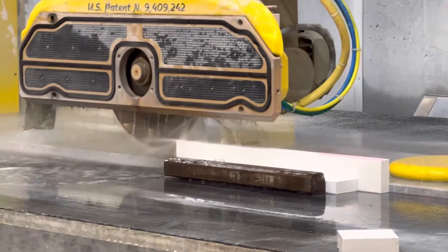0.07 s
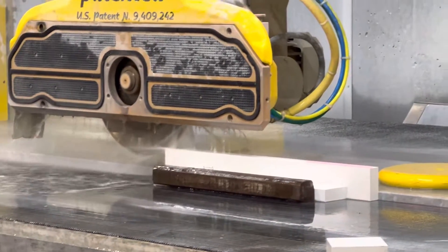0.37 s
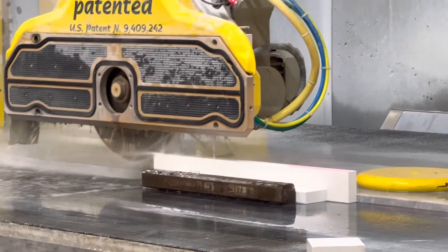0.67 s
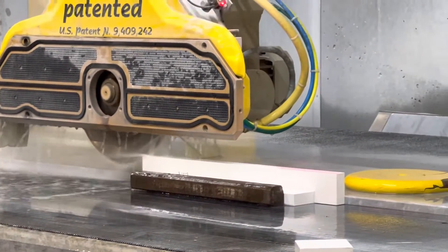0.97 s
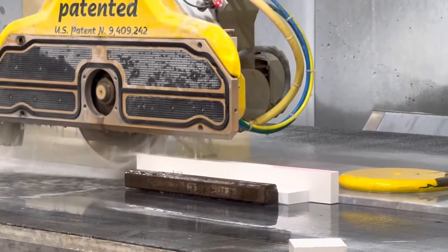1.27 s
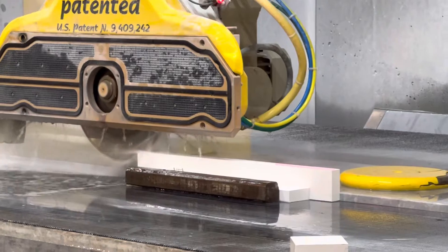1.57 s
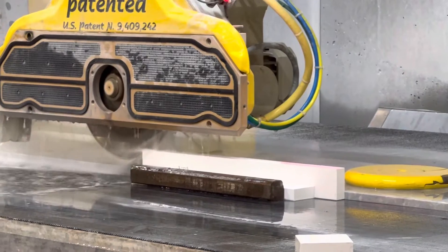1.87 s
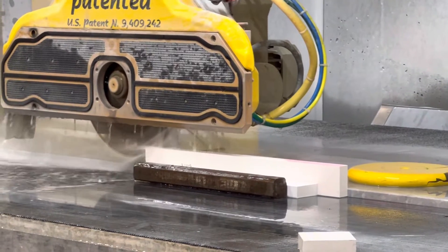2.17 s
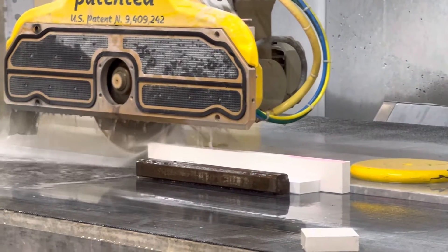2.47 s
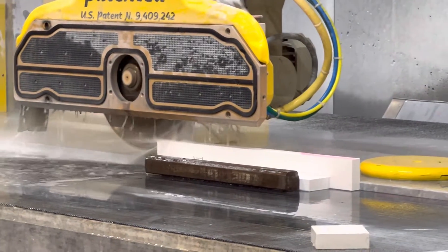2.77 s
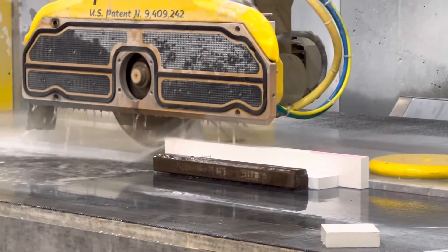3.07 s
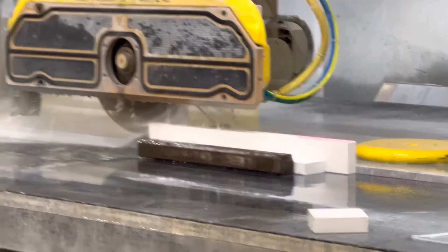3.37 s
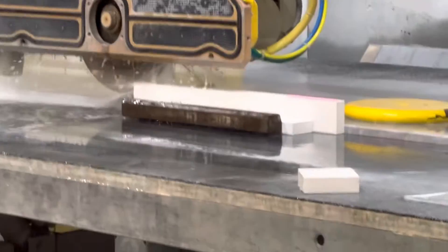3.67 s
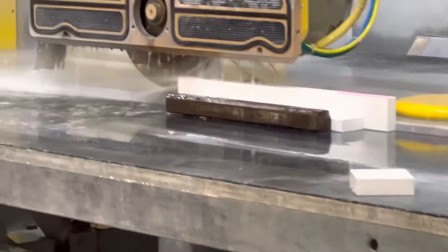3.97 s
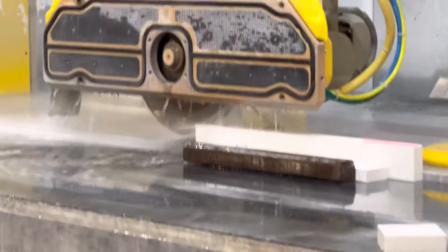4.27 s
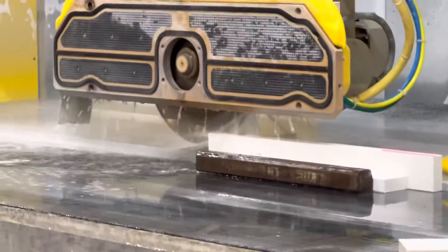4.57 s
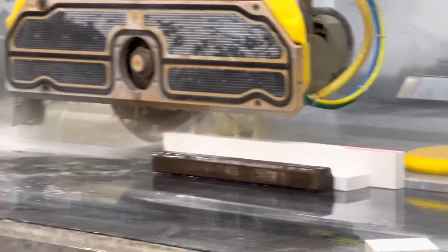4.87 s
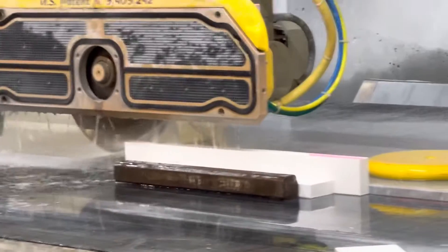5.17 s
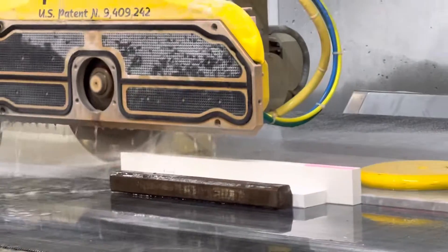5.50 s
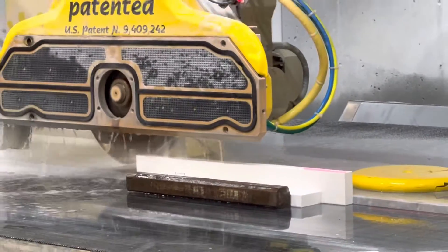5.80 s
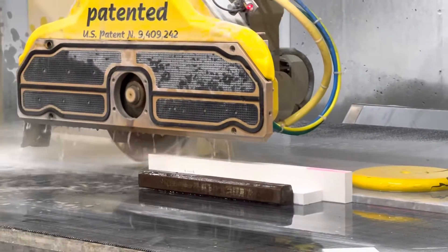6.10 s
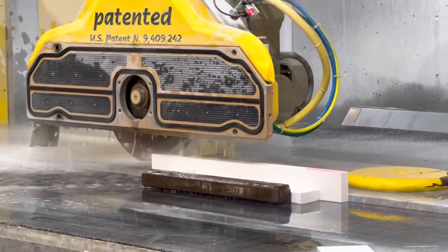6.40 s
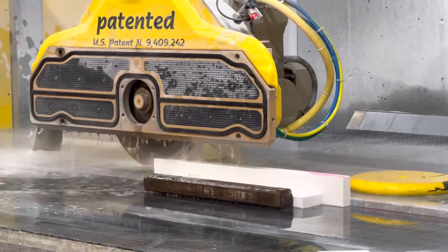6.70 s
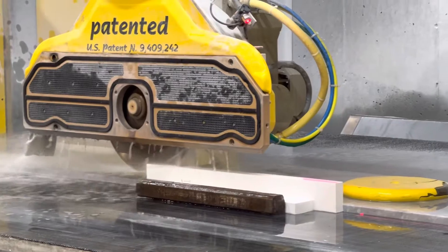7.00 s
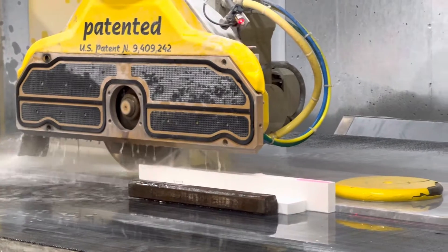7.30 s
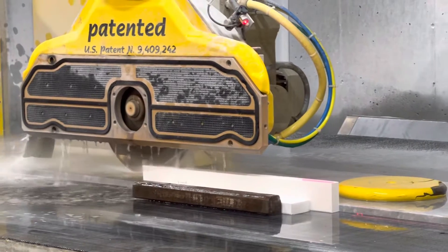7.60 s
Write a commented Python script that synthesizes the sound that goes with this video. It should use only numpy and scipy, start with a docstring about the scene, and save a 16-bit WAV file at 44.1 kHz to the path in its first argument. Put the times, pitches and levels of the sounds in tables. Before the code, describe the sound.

A water-cooled saw cuts stone with a loud, throbbing, rasping drone, over hissing spray and a low machine rumble.

```python
"""A throbbing, rasping drone: a water-cooled bridge saw cuts a stone slab, a metre or two from a phone.
The diamond blade turns 25 times a second, and its 28 segments drone, chatter and grind in a pattern
that comes round with every turn, while friction sets the steel disc singing. It bites hard for the
first second, then cuts more lightly; cooling water hisses off the rim and the machine bed rumbles."""
import sys
import numpy as np
from scipy import signal
from scipy.fft import rfft, irfft, next_fast_len
from scipy.io import wavfile
from scipy.ndimage import uniform_filter1d, map_coordinates

SR = 44100
rng = np.random.default_rng(int(sys.argv[2]) if len(sys.argv) > 2 else 0)


def inscribe(sig):
    """Save sig as 16-bit PCM at rate SR to the path in sys.argv[1].

    A 1-D sig is mono; a 2-D sig holds one channel per row.
    Samples are clipped to [-1, 1] before scaling.
    """
    pcm = np.round(np.clip(np.atleast_2d(sig).T, -1, 1) * 32767)
    wavfile.write(sys.argv[1], SR, pcm.astype(np.int16))


N = 346185
STEP_RATE_HZ, TOP_HZ = 50, 15750  # update rate of slow changes; upper band edge
TIME = np.arange(N) / SR
STEP_TIME = np.arange(int(N / SR * STEP_RATE_HZ) + 3) / STEP_RATE_HZ
BIN_HZ = np.maximum(np.fft.rfftfreq(next_fast_len(N), 1 / SR), 1)
SIDES = np.array([[1], [-1]])  # left, right

# rotation of the blade: time_s, turn_rate_hz
BLADE_SPEED = [(0, 24.99), (0.7, 24.99), (1.3, 24.95), (3, 24.935), (4.1, 24.95), (5.4, 24.91),
               (7.85, 24.905)]
TURN_HZ = BLADE_SPEED[0][1]
# how hard the blade bites: time_s, bite_fraction
BITE = [(0, 0.79), (.85, 0.97), (1.1, 0.68), (1.28, .4), (2.2, 0.19), (3, 0.18), (7.85, 0.05)]


def segment_drone(turns, segments=28, spindle_order=9, slot_width_hz=400, waver_db=2.0, wall_db=-16):
    """Periodic impact: segments strike the stone, and sidebands a turn rate apart make the tone throb."""
    # harmonics (orders) of the turn rate from the uneven rim: order, hard_bite_db, light_cut_db
    rim_harmonics = [(4, -68, -42), (7, -51, -48), (12, -94, -42), (13, -68, -50), (14, -70, -41.5),
                     (15, -52, -46), (17, -39, -51), (18, -39.5, -52.5), (19, -46.5, -48.5),
                     (21, -64, -51.5), (22, -37, -47), (24, -47.5, -51.5), (25, -84, -49.5),
                     (26, -29.5, -53.5), (27, -51, -49.5), (28, -44.5, -53), (29, -41.5, -43.5),
                     (30, -42, -45), (31, -51, -42), (32, -31.5, -41), (33, -33.5, -42.5),
                     (34, -48.5, -42.5), (35, -40.5, -37), (36, -36.5, -39), (37, -45.5, -41),
                     (38, -35.5, -54), (39, -41.5, -44), (40, -38, -48.5), (41, -35.5, -53), (42, -36, -50),
                     (43, -35.5, -51.5), (45, -51.5, -57), (56, -40.5, -50), (113.3, -45, -64)]
    # tones that swell as the blade advances: start_s, end_s, order, peak_db
    swells = [(-.1, 1.5, 28, -24.5), (0.899, 1.1, 28, -39), (.55, 1.6, 41, -35), (.6, 3.67, 17, -37.5),
              (1.12, 1.54, 56, -38), (1.5, 2.01, 56, -36.5), (1.1, 2.6, 35, -36), (.8, 2.7, 42, -39),
              (1.05, 1.6, 45, -44), (1.4, 2.9, 40, -39), (2.05, 4.7, 28, -33.5), (2.1, 4.3, 25, -39),
              (2.3, 3.53, 56, -34.5), (2.599, 4, 45, -47), (3.3, 4.8, 29, -32.5), (3.55, 4.3, 37, -32.5),
              (3.5, 4.5, 38, -40.5), (3.6, 5.9, 35, -35.5), (3.6, 5, 40, -40.5), (3.95, 4.4, 56, -38.5),
              (4.35, 4.7, 56, -39), (4.3, 5.2, 21, -41), (4.5, 6.0, 33, -31.5), (4.8, 7.4, 36, -35.5),
              (4.65, 6.4, 28, -34), (5, 6.3, 27, -42), (5.3, 6.4, 56, -41), (5.3, 7.5, 29, -33),
              (5.6, 6.7, 31, -37), (6.2, 7.4, 24, -40.5), (6.4, 7.9, 35, -32.5), (6.501, 8.5, 32, -35),
              (6.9, 8.2, 22, -38.5), (7.05, 8.3, 34, -34), (7.15, 8.1, 37, -35.5)]
    # hum of the spindle: time_s, level_db
    spindle_hum = [(0.0, -54), (0.15, -36.5), (0.96, -31), (5.05, -39.5), (7.85, -39.5)]
    # chatter at a slot resonance that moves with the contact: time_s, level_db, centre_hz
    chatter = [(0.0, -30.5, 810), (0.06, -27, 790), (0.68, -26.5, 810), (1.38, -31.5, 887),
               (2.16, -30.5, 940), (3.21, -35, 862.2), (3.85, -28.5, 900), (4.2, -29.5, 910),
               (4.45, -31.5, 879), (4.72, -32.5, 870), (4.98, -31, 831), (5.38, -28.5, 830),
               (6.64, -33.5, 810), (7.85, -30, 856)]
    count = 4 * segments + 1
    hz = np.maximum(np.arange(count) * TURN_HZ, 1)
    bite = curves(BITE, STEP_TIME)[0]
    amplitude = np.zeros((len(STEP_TIME), count))
    for order, hard_db, light_db in rim_harmonics:
        amplitude[:, min(round(order), count - 1)] = undb(light_db + bite * (hard_db - light_db))
    amplitude *= undb(waver_db * walks(memory_s=np.full(count, .45)))
    for start, end, order, db in swells:
        amplitude[:, order] = np.hypot(amplitude[:, order], undb(db) * arch(STEP_TIME, start, end))
    amplitude[:, spindle_order] = undb(curves(spindle_hum, STEP_TIME)[0])
    # the resonance reweights orders 30-43, and the chatter level replaces their joint level
    chatter_db, centre_hz = curves(chatter, STEP_TIME[:, None])
    slot = slice(30, 44)
    ringing = amplitude[:, slot] / np.hypot(1, 2 * (hz[slot] - centre_hz) / slot_width_hz)
    amplitude[:, slot] = undb(chatter_db) * ringing / np.linalg.norm(ringing, axis=1, keepdims=True)
    # tones near the segment rate bunch into strokes; the others wander freely
    phase = 2 * np.pi * rng.random(count) + walks(memory_s=np.full(count, 1.6))
    near = slice(22, 46)
    phase[:, near] = stroke_phases(amplitude[:, near])
    direct = amplitude * np.exp(1j * phase)
    # the slot radiates to the left, more so in a hard bite; the walls give each tone its own side
    beam = np.exp(-np.log2(hz / 830) ** 2)
    pan_db, lead_rad = 3 + 3 * bite[:, None], 0.75
    leftward = beam * (np.log(undb(pan_db)) + 1j * lead_rad) / 2
    side = leftward + undb(wall_db) * (.5 + beam) * drift(memory_s=np.full(count, 1.5))
    return np.array([spin(direct * (1 + sign * side), turns) for sign in (1, -1)])


def stroke_phases(amplitude, rim_force=.13, spot_width_turns=.06, pull=.45, wear_rad=.1):
    """Phase locking: high spots on the rim pull the drone's tones into bursts where they rub."""
    # one high spot after another rubs hardest: start_s, end_s, place_turns, relative_force
    high_spots = [(-.5, 1.15, .6, .85), (-.5, 1.1, .93, .85), (-.5, 1.15, .06, .5), (-.5, 1.2, .42, .3),
                  (.7, 1.4, .86, .25), (1, 1.8, .11, .3), (1.2, 2.7, .52, .1), (2, 3.7, .62, .14),
                  (1.5, 3.6, .89, .07), (2.9, 4.3, .35, .14), (3.4, 4.8, .46, .12), (3.5, 4.8, .76, .16),
                  (3.6, 4.5, .01, .14), (3.5, 6, .2, .18), (4.5, 6.3, .64, .9), (4.6, 6.5, .84, .7),
                  (5.2, 7.2, .51, .35), (6, 7.4, .08, .6), (6, 8.3, .77, .3), (6.9, 8.5, .36, .7),
                  (6.5, 8.5, .94, .3)]
    points, settle_steps = 256, 60
    place = np.arange(points) / points
    force = np.full((len(STEP_TIME), points), rim_force)
    for start, end, angle, strength in high_spots:
        away = (place - angle + .5) % 1 - .5
        spot = np.exp(-(away / spot_width_turns) ** 2)
        force += strength * arch(STEP_TIME, start, end)[:, None] * spot
    tones = amplitude.shape[1]
    phase, out = 2 * np.pi * rng.random(tones), np.zeros(amplitude.shape)
    for step in np.maximum(np.arange(-settle_steps, len(STEP_TIME)), 0):
        shake = np.fft.ifft(amplitude[step] * np.exp(1j * phase), points)
        driven = np.fft.fft(force[step] * np.exp(1j * np.angle(shake)))[:tones]
        phase = phase + pull * np.sin(np.angle(driven) - phase) + wear_rad * rng.standard_normal(tones)
        out[step] = phase
    return out


def grinding(turns, patch_db=1.9, patch_s=0.94, wall_db=-5):
    """Quasi-periodic friction noise: the same grit scrapes each turn; finer scratches change sooner."""
    # diamond grit on stone: frequency_hz, density_db
    grit_spectrum = [(250, -73.5), (500, -68.5), (950, -68), (1250, -68.5), (1600, -69.5), (2300, -66.5),
                     (3000, -68.5), (4500, -69.5), (6500, -65.5), (8500, -67.5), (12000, -67), (16000, -69)]
    hz = np.maximum(np.arange(int(TOP_HZ / TURN_HZ)) * TURN_HZ, 1)
    rasp_db = -0.5 + 1.5 * curves(BITE, STEP_TIME[:, None])[0]  # a hard bite rasps louder
    fine = np.clip(np.log2(hz / 2500), 0, 1)
    amplitude = colour(grit_spectrum, hz) * np.sqrt(TURN_HZ) * undb((1 - fine) * rasp_db) * (hz > 200)
    # the disc's close-set modes lift neighbouring harmonics together, and shift as the contact moves
    patches = np.sqrt(2) * uniform_filter1d(walks(np.full(len(hz), patch_s)), size=2, axis=1)
    amplitude *= undb(patch_db * (1 - fine / 5) * patches)
    memory_s = 0.21 * 2000 / np.maximum(hz, 500)
    walls = undb(wall_db) / np.hypot(1, (hz / 1300) ** 4)
    direct = spin(amplitude * drift(memory_s), turns)
    return direct + SIDES * spin(amplitude * walls * drift(memory_s), turns)


def singing_and_whine(turns, waver_rad=0.39, waver_s=0.032):
    """Friction-excited vibration: disc modes swell and fade beside a thin whine; all flutter each turn."""
    # modes of the steel disc and, in the last row, a faint 12.3 kHz whine through the whole cut, fluttering
    # like the rest: start_s, end_s, pitch_hz, level_db
    tones = [(-.3, .3, 4130, -41), (-.3, 0.28, 3680, -45), (-.3, 0.16, 2360, -35.5), (-.3, 0.43, 2790, -39),
             (.2, .6, 5598, -41), (.35, 1.7, 1660, -42), (.3, 1.4, 8730, -42), (.52, 1.0, 2797, -34.3),
             (.85, 1.27, 2355, -38.5), (1.05, 1.4, 2793, -36.5), (.75, 2, 6980, -43),
             (1.2, 3.9, 660, -38.5), (1.45, 3.2, 992, -37.5), (1.45, 2.13, 2340, -40), (1.4, 2, 2430, -44),
             (1.3, 2.3, 6155, -43), (1.3, 2.3, 8030, -43), (1.4, 2.4, 3790, -46), (1.5, 3.4, 2792, -44),
             (2.2, 3.4, 6350, -42), (2.4, 3.4, 6540, -43), (3.1, 4.7, 3440, -45), (3.4, 4.46, 5465, -42),
             (3.5, 4.7, 6640, -43), (4.1, 5, 8820, -42), (4.7, 8.2, 3665, -46), (4.8, 8.5, 5235, -45),
             (5.55, 6.15, 5500, -46), (5.9, 6.253, 8380, -43), (6.2, 7.6, 3515, -45), (6.2, 6.9, 6350, -43),
             (6.6, 7.5, 6640, -46), (3.9, 4.4, 912, -35.5), (4.9, 7.9, 5576, -41), (-1, 11, 12306, -48)]
    out = np.zeros(N)
    flutter = .15 + .42 * curves(BITE, TIME)[0]  # deeper in a hard bite
    for (start, end, hz, db), angle in zip(tones, rng.random(len(tones))):
        on = (TIME > start) & (TIME < end)
        turn_rad = 2 * np.pi * (turns[on] + angle) + walk(waver_s)[on]  # the push slips round the rim
        push = (1 + flutter[on] * np.cos(turn_rad)) / np.sqrt(1 + flutter[on] ** 2 / 2)
        bend_rad = waver_rad * walk(waver_s)[on] + flutter[on] * np.sin(2 * turn_rad)
        envelope = np.sqrt(2) * undb(db) * arch(TIME[on], start, end) * push
        out[on] += envelope * np.sin(2 * np.pi * hz * TIME[on] + bend_rad)
    return out


def water_spray(turns, flutter_db=1.3, swing=0.092, mist_build_s=1.4):
    """Amplitude-modulated noise: water flung off the rim hisses, flutters and swings with every turn."""
    # spectrum of the hiss as heard, with gaps near 6.5 and 10 kHz: frequency_hz, density_db
    hiss_spectrum = [(500, -79), (1000, -70), (1600, -70), (4400, -75.5), (6500, -104), (8500, -65.5),
                     (10300, -93), (11400, -64.5), (12300, -62), (13700, -66), (15700, -70.5)]
    # the hiss sounds wide in a few treble bands and centred between them: frequency_hz, side_db
    stereo_width = [(1000, -16), (2200, -65), (3400, -33), (4800, -48), (7200, -42), (7800, -9), (8900, -5),
                    (10000, -32), (11200, -1), (12400, -14), (13300, -27), (14200, -25), (14700, -6)]
    density = colour(hiss_spectrum, BIN_HZ)
    mist_share = 1 / (1 + (9500 / BIN_HZ) ** 8)  # the finest drops hiss highest
    side_db = np.interp(BIN_HZ, *np.transpose(stereo_width))
    splash = wide_noise(density * np.sqrt(1 - mist_share), side_db)
    mist = wide_noise(density * np.sqrt(mist_share), side_db)
    mist *= undb(-2.05 - 11.5 * np.exp(-TIME / mist_build_s))  # builds up as the slot deepens
    flutter = undb(flutter_db * walk(memory_s=0.007))
    return (splash + mist) * flutter * (1 + swing * np.sin(2 * np.pi * turns))


def bed_rumble(boom_hz=85.8, boom_floor_db=-43, bed_side_db=-15, slab_side_db=-10.5, pan_db=-1.6):
    """Forced vibration: motor and cut shake the slab and the bed, which booms at its lowest resonance."""
    # motor, bed and slab: frequency_hz, density_db
    rumble_spectrum = [(20, -100), (32, -83), (45, -64.5), (60, -59.5), (85, -61), (115, -55.5),
                       (150, -61.5), (200, -58), (270, -60), (340, -60), (450, -63.5), (800, -64.5),
                       (1300, -71.5), (2500, -100)]
    # the low rumble eases about five seconds in, then recovers: time_s, change_db
    low_rumble = [(0, 0.4), (4.5, 1.5), (5.2, -2), (7.85, 0.5)]
    # the slab rumbles on the bed, counted from its mean level: time_s, level_db
    slab_shake = [(0.3, -34.5), (0.38, -33.5), (2.97, -37.5), (4.93, -32.5), (7.85, -34.5)]
    # slab resonances that emerge as the cut deepens: centre_hz, width_hz, relative_peak_db
    slab_modes = [(334, 15, 3.5), (363, 21, 3.5)]
    # irregular swells of the bed's resonance: start_s, end_s, peak_db
    booms = [(.05, 0.343, -35), (.55, .9, -41), (1.15, 1.62, -34.5), (1.861, 2.059, -40),
             (2.302, 2.512, -36), (2.8, 3.248, -37), (3.879, 4.079, -37), (4.171, 4.353, -33),
             (4.55, 4.765, -33.5), (5.45, 5.599, -37), (5.95, 6.35, -38), (6.618, 7.121, -36.5)]
    density = colour(rumble_spectrum, BIN_HZ)
    slab_share = 1 / (1 + (250 / BIN_HZ) ** 6)
    bed = wide_noise(density * np.sqrt(1 - slab_share), bed_side_db) * undb(curves(low_rumble, TIME)[0])
    body = density * np.sqrt(slab_share)
    modes = sum(undb(db) / (1 + (2 * (BIN_HZ - hz) / width) ** 2) for hz, width, db in slab_modes)
    ring = wide_noise(body * modes, slab_side_db) * np.interp(TIME, (3.4, 4.1), (0, 1))
    slab_db = curves(slab_shake, TIME)[0]
    slab = (wide_noise(body, slab_side_db) + ring) * undb(slab_db - slab_db.mean())
    swell = undb(boom_floor_db)
    for start, end, db in booms:
        swell = np.hypot(swell, undb(db) * arch(TIME, start, end))
    boom = np.sqrt(2) * swell * np.sin(2 * np.pi * boom_hz * TIME + 1.4 * walk(memory_s=0.067))
    return (bed + slab + boom) * undb(SIDES * pan_db / 2)


def spin(harmonics, turns, size=8192):
    """Fourier synthesis of a force pattern read round the rim; column k is the complex rms of order k."""
    rim = irfft(harmonics, size) * size / np.sqrt(2)
    return map_coordinates(rim, [TIME * STEP_RATE_HZ, turns % 1 * size], order=1, mode="grid-wrap")


def undb(db):
    """Decibels to amplitude gain."""
    return 10 ** (np.asarray(db) / 20)


def curves(table, at):
    """Linear interpolation of each column of a (time_s, ...) table at the given times."""
    time_s, *columns = np.transpose(table)
    return [np.interp(at, time_s, column) for column in columns]


def arch(at, start, end):
    """Envelope that rises from nothing and dies away: a broadened half sine."""
    return np.sin(np.pi * np.clip((at - start) / (end - start), 0, 1)) ** 0.557


def colour(points, hz):
    """Spectral envelope: gain of a (frequency_hz, level_db) table at the given frequencies."""
    point_hz, db = np.transpose(points)
    return undb(np.interp(np.log(hz), np.log(point_hz), db))


def filtered(x, gain):
    """Frequency-domain filtering with one gain per bin."""
    size = next_fast_len(N)
    return irfft(rfft(x, size) * gain, size)[..., :N]


def wide_noise(density, side_db):
    """Mid-side stereo: centred noise (amplitude per root Hz) plus a share opposed in the two channels."""
    gain = density * np.sqrt(SR / 2)
    mid = filtered(rng.standard_normal(N), gain)
    return mid + SIDES * filtered(rng.standard_normal(N), gain * undb(side_db))


def drift(memory_s):
    """Complex Gaussian processes of power 1, steps x walks, each with its own correlation time."""
    size = 1024
    white = rng.standard_normal((size, len(memory_s), 2)) @ np.array([1, 1j])
    smooth = np.exp(-(np.pi * np.fft.fftfreq(size, 1 / STEP_RATE_HZ)[:, None] * memory_s) ** 2 / 2)
    rms = np.sqrt(2 * np.mean(smooth ** 2, axis=0) / size)
    return np.fft.ifft(white * smooth / rms, axis=0)[:len(STEP_TIME)]


def walks(memory_s):
    """Real Gaussian processes of spread 1, steps x walks."""
    return np.sqrt(2) * drift(memory_s).real


def walk(memory_s):
    """One such process, interpolated to every sample."""
    return np.interp(TIME, STEP_TIME, walks(np.array([memory_s]))[:, 0])


def scene():
    """Superposition: four layers follow the blade's one angle of rotation, over the bed's rumble."""
    turns = np.cumsum(curves(BLADE_SPEED, TIME)[0]) / SR
    cutting = segment_drone(turns) + grinding(turns) + singing_and_whine(turns)
    return cutting + water_spray(turns) + bed_rumble()


def record(dry):
    """Interchannel phase difference in the treble, followed by a steep low-pass."""
    # the left channel's treble lags the right in uneven steps: frequency_hz, lag_rad
    treble_lag = [(20, 0), (7400, 0), (7750, .5), (8700, 1.3), (9200, 2.8), (10000, 3.14), (10800, 3.3),
                  (11100, 4.0), (12300, 5.4), (12800, 6.1), (14300, 6.4), (14600, 7.2), (15700, 8.9)]
    lag_rad = np.interp(BIN_HZ, *np.transpose(treble_lag))
    channels = filtered(dry, np.exp(-1j * SIDES * lag_rad / 2))
    return signal.sosfilt(signal.ellip(12, .1, 90, TOP_HZ, fs=SR, output="sos"), channels)


dry = scene()
out = record(dry)
inscribe(out)
```